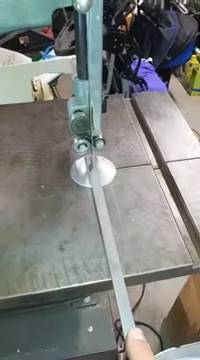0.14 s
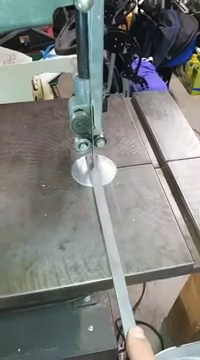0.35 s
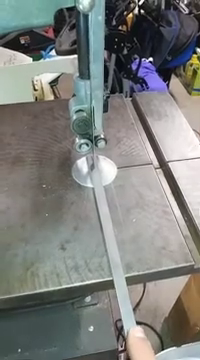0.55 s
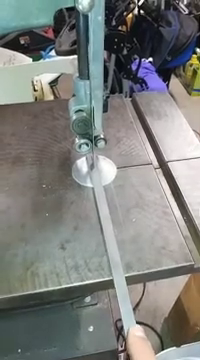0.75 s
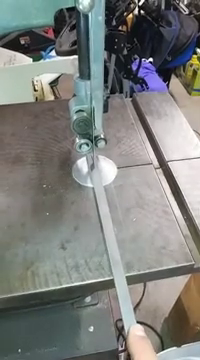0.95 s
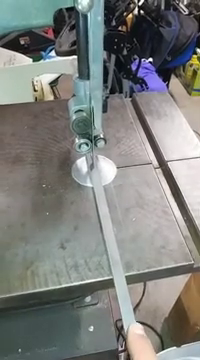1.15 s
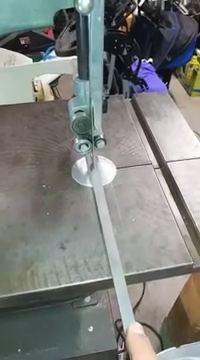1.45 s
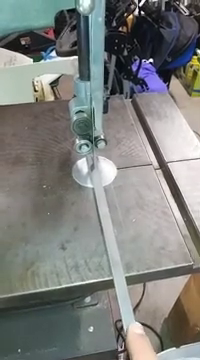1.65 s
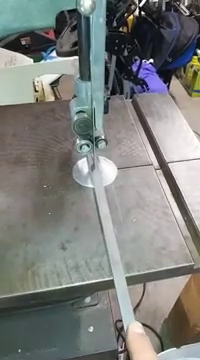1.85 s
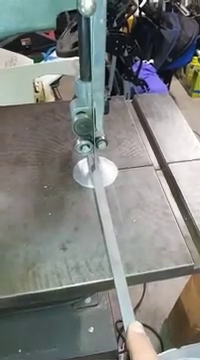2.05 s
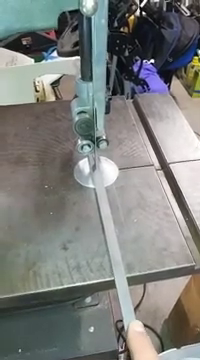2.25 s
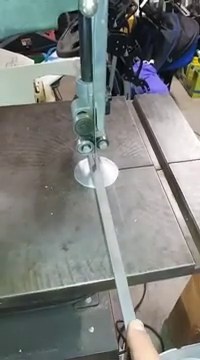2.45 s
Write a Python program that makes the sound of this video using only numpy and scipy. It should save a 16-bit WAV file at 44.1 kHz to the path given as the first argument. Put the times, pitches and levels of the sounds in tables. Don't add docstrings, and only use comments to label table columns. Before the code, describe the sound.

A bandsaw cuts a steel bar without pause, close to a phone microphone in a workshop; harsh grinding roar, two wavering metallic rings, gritty hiss and a faint motor hum, loud and compressed throughout.

```python
import sys
import numpy as np
from scipy import signal
from scipy.fft import rfft, irfft
from scipy.io import wavfile
from scipy.ndimage import uniform_filter1d, minimum_filter1d

SR = 44100
rng = np.random.default_rng(int(sys.argv[2]) if len(sys.argv) > 2 else 0)


def amplitude_ratio(level_db):
    exponent = np.asarray(level_db, float) / 20
    return 10 ** exponent


def output_pcm(signal):
    pcm = np.clip(np.atleast_2d(signal).T, -1, 1) * 32767
    wavfile.write(sys.argv[1], SR, np.round(pcm).astype(np.int16))


N = 114660

# start_s, level_db
FEED_COURSE = [
    (0, 0),
    (.3, 4),
    (.65, -2),
    (.87, -1.5),
    (1.02, -3.5),
    (1.2, -1),
    (1.4, -0.5),
    (1.7, 2),
    (2.3, 0.5),
    (2.6, 4),
]


def evened(x):
    return x / np.sqrt(np.mean(x ** 2, axis=-1, keepdims=True) + 1e-20)


def read(points, hz):
    f, *cols = np.transpose(points)
    return np.array([np.interp(np.log(hz + 1), np.log(f + 1), c) for c in cols])


def control(rows, index=1):
    return np.interp(np.arange(N) / SR, np.transpose(rows)[0], np.transpose(rows)[index])


def drift(top_hz):
    hop = 64
    steps = N // hop + 2
    lowpass = 1 / (1 + (np.fft.rfftfreq(steps, hop / SR) / top_hz) ** 4)
    slow = irfft(rfft(rng.standard_normal(steps)) * lowpass, steps)
    return np.interp(np.arange(N) / hop, np.arange(steps), evened(slow))


def surges(rows):
    t = np.arange(N) / SR
    return sum(db * np.exp(-(2 * (t - s) / length_s) ** 2) for s, db, length_s in rows)


def above(x, edge_hz):
    return irfft(rfft(x) * (np.fft.rfftfreq(N, 1 / SR) > edge_hz), N)


def ports(pair, hz):
    # freq_hz, likeness [0-1], left_lead_rad
    port_likeness = [(60, .28, 1), (110, 0.49, 0.4), (171, 0.14, 1.5), (284, 0.73, -1.5), (500, 0.43, 1.75),
                     (760, 0.72, -0.5), (990, 0.68, -1.33), (1570, 0.65, 0.7), (2026, 0.92, -0.48),
                     (2310, 0.32, 2.5), (3240, 0.25, 2), (4240, 0.18, 3.5), (5830, 0.39, 7),
                     (7250, 0.33, 5)]
    same, lead_rad = read(port_likeness, hz)
    same = np.clip(same, -1, 1)
    right = same * np.exp(-1j * lead_rad) * pair[0] + np.sqrt(1 - same ** 2) * pair[1]
    return np.array([pair[0], right])


def bites():
    bites_per_s, spread_db = 5000, 4.5
    size = amplitude_ratio(spread_db * np.minimum(rng.exponential(1, (N, 2)), 5)) * rng.standard_normal((N, 2))
    return evened((size * (rng.random((N, 2)) < bites_per_s / SR)).T)


def modes(table, strand_db):
    strand_hz = 3.7
    hz, drive = np.fft.rfftfreq(N, 1 / SR), rfft(bites())
    apart = np.exp(-2j * np.pi * hz * 0.137)
    total = 0
    for k, (mode_hz, width_hz, left_db, right_db) in enumerate(table):
        level_db = np.array([[left_db], [right_db]]) + strand_db * drift(strand_hz)
        resonance = 1 / (1 + 1j * (hz - mode_hz) / width_hz) ** 2
        ringing = irfft(ports(drive, mode_hz) * apart ** k * resonance, N)
        total = total + amplitude_ratio(level_db) * evened(ringing)
    return total


def noise(spectrum, patch_db):
    frames, hz = N // 256 + 5, np.fft.rfftfreq(1024, 1 / SR)
    a, b, c, d, patches = rng.standard_normal((frames, 513, 5)).T
    patches = uniform_filter1d(patches, size=10, axis=0)
    patches = evened(uniform_filter1d(patches, size=10, axis=1))
    level_db = read(spectrum, hz)[:, :, None] + patch_db * patches
    z = ports([a + 1j * b, c + 1j * d], hz[:, None]) * amplitude_ratio(level_db)
    return 9.1 * signal.istft(z, nperseg=1024, noverlap=768)[1][:, :N]


def bite_level():
    # start_s (centre), level_db, length_s
    grabs = [(0.027, 11, 0.034), (.129, 5, 0.064), (0.28, 2, 0.02), (0.363, 3.5, 0.061), (0.484, 7, 0.062),
             (0.569, 10, 0.028), (0.696, 7, 0.062), (0.808, 5.5, 0.033), (0.956, 2.5, 0.042),
             (1.105, 4.5, .038), (1.247, 3.5, 0.036), (1.309, 9, 0.035), (1.353, 7.5, 0.018),
             (1.413, 3, 0.018), (1.45, 7.5, 0.0098), (1.73, 7, 0.039), (1.905, 1.5, 0.034),
             (2.11, 3, 0.022), (2.26, 3, 0.039), (2.361, 8.5, 0.031), (2.448, 6.5, 0.028),
             (.09, -0.5, 0.022), (.21, 5, 0.014), (.435, -4.5, .04), (.525, 2, 0.017), (.62, 2.5, 0.022),
             (.765, -0.5, .03), (.845, 3, 0.029), (.91, 1.5, .02), (1.17, 1, .03), (1.51, 2.5, .03),
             (1.57, 0.5, 0.023), (1.625, 1.5, .03), (1.685, -3.5, .04), (1.965, 0.5, 0.034),
             (2.145, 0.5, .03), (2.405, -2.5, .03), (2.51, -1.5, 0.024)]
    flicker_db, flicker_hz = 0.9, 24.4
    return control(FEED_COURSE) + surges(grabs) - 1.0 + flicker_db * drift(flicker_hz)


def motor():
    # freq_hz, level_db
    hum_lines = [
        (120, -47),
        (240, -42.5),
    ]
    t = np.arange(N) / SR
    total = 0
    for hz, db in hum_lines:
        level = amplitude_ratio(db + 2.5 * drift(3.1)) * np.sqrt(2)
        total = total + level * np.sin(2 * np.pi * (hz * t + rng.random()) + 1.1 * drift(7.2))
    return total


def frame(bite_db):
    # freq_hz, width_hz, left_db, right_db
    frame_modes = [(313, 12.6, -36, -36.5), (355.2, 8, -41.5, -35.5), (449.2, 28, -30, -35),
                   (642.5, 25, -25.5, -61), (740.7, 21.3, -26.5, -32), (834, 50, -24.5, -35),
                   (914.5, 23, -23.5, -23.5), (975, 28, -24, -24.5), (1337, 30, -35.5, -34),
                   (1536, 26, -28, -31.5), (1678, 24.6, -32, -27), (2010, 22, -33.5, -29.5),
                   (2104, 32, -38, -29.5), (2147, 9.2, -42.5, -26.5)]
    # freq_hz, left_db_per_hz, right_db_per_hz
    roar = [(25, -81, -82), (100, -70, -67.5), (200, -64.5, -65.5), (443, -61, -59.5), (804, -53.5, -57.5),
            (1210, -52.5, -57.5), (2630, -60, -58), (7360, -115, -115)]
    # start_s (centre), level_db, length_s
    upper_flares = [(.1, 1, 0.059), (.33, 0, 0.034), (.625, -6, 0.026), (.905, 5, 0.029), (.995, -2, .04),
                    (1.39, -1.5, 0.045), (1.55, 1, 0.042), (1.95, 1.5, 0.13), (2.04, -1, 0.061),
                    (2.3, 2, 0.13), (2.55, 0.5, 0.079)]
    follows, upper_hz, upper_follows = 0.23, 1780, 0.14
    body = (modes(frame_modes, strand_db=2) + noise(roar, patch_db=0.5)) * amplitude_ratio(follows * bite_db)
    upper_gain = amplitude_ratio(upper_follows * bite_db + surges(upper_flares))
    return body + above(body, upper_hz) * (upper_gain - 1)


def blade_rasp(bite_db):
    # freq_hz, width_hz, left_db, right_db
    rasp_mode = [(5370, 120, -33, -33)]
    fade_db_per_s = -12
    return modes(rasp_mode, strand_db=2.5) * amplitude_ratio(bite_db + fade_db_per_s * np.arange(N) / SR)


def blade_and_chips(bite_db):
    # freq_hz, width_hz, left_db, right_db
    squeal_modes = [(1599, 33, -33, -34.5), (2341, 30, -47, -35.5), (2690, 990, -58, -30.5),
                    (3030, 19, -41, -48), (3082, 31, -48.5, -33.5), (3823, 57, -39, -39),
                    (4230, 60, -44, -39), (4620, 70, -61, -37), (5345, 270, -34, -34.5),
                    (6340, 230, -40.5, -45), (6670, 240, -53, -41), (7320, 270, -76, -24.5),
                    (7506, 72, -86, -26.5), (7820, 200, -77, -26)]
    # freq_hz, left_db_per_hz, right_db_per_hz
    hiss = [(1500, -71.5, -71), (3280, -63.5, -67), (6200, -72, -59.5), (7300, -101, -60),
            (8800, -110, -69.5), (10600, -91, -70.5), (11330, -84.5, -69.5), (15500, -84, -79.5)]
    air_hz, air_follows = 12000, 0.5
    chips = (modes(squeal_modes, strand_db=1.5) + noise(hiss, patch_db=0.5)) * amplitude_ratio(bite_db)
    return chips + above(chips, air_hz) * (amplitude_ratio(air_follows * control(FEED_COURSE)) - 1)


def ring(table, swell, lapses, core_db, lag_rad, wander_rad):
    steady, hold = 0.6, 0.9
    base_core_db, cluster_db, core_waver_db, port_slip_rad = -4.5, -5, 2.5, 0.59
    cluster = modes(table, strand_db=1.25)
    flutter = np.sqrt(abs(uniform_filter1d(cluster ** 2, size=400, axis=1))) + 0.025
    cluster = evened(cluster / flutter ** steady)

    port_lag = -lag_rad + port_slip_rad * drift(7.8)
    slips = wander_rad * drift(14.4) + np.array([[0], [1]]) * port_lag
    turns = np.cumsum(control(swell, index=2)) / SR
    core = np.sqrt(2) * np.sin(2 * np.pi * turns + slips)
    core = core * amplitude_ratio(core_waver_db * np.array([drift(5.7), drift(14.0)]))

    both = amplitude_ratio(base_core_db + core_db) * core + amplitude_ratio(cluster_db) * cluster
    beating = np.sqrt(abs(uniform_filter1d(np.mean(both ** 2, axis=0), size=500))) + 0.25
    return both / beating ** hold * amplitude_ratio(control(swell) + surges(lapses) + 3.5)


def high_ring():
    # freq_hz, width_hz, left_db, right_db
    cluster = [(1110.5, 7.3, 19.5, 5), (1120.8, 14.8, 14, 2.5), (1118, 27, 2, 10), (1125, 6, 10, -52.5)]
    # start_s, level_db, pitch_hz (clean core)
    swell = [(0, -22, 1125), (0.169, -15, 1118), (.33, -14, 1107), (.4, -15.5, 1105), (.53, -10.5, 1121),
             (.62, -16.5, 1113), (.73, -9.5, 1118), (.82, -17.5, 1121), (1.099, -19, 1116),
             (1.3, -17, 1124), (1.499, -20, 1109), (1.6, -16, 1112), (1.751, -21, 1120), (1.95, -20, 1108),
             (2.03, -15.5, 1126), (2.32, -17, 1104), (2.45, -23.5, 1122), (2.6, -15, 1112)]
    # start_s (centre), level_db, length_s
    slips = [(0.063, -11, .025), (0.112, -10, .03), (0.219, -18, 0.018), (0.261, -21, 0.019),
             (0.308, -13, .02), (0.444, -2, .03), (0.58, -7.5, 0.037), (.688, -8, 0.022), (.87, -5, 0.027),
             (.93, 1.5, 0.034), (1.015, -3, .03), (1.113, 3, 0.023), (1.184, -6, .03), (1.313, -8, 0.016),
             (1.375, -9, 0.022), (1.474, -1, 0.018), (1.545, -8, 0.034), (1.624, -2, .025), (1.693, 0, .03),
             (1.753, -5, 0.029), (1.783, 6.5, 0.037), (1.905, -8, 0.037), (2.065, 2, 0.022),
             (2.187, -2, .025), (2.253, -3, 0.023), (2.359, -1, .03), (2.452, -13, 0.022)]
    return ring(cluster, swell, slips, core_db=-3.5, lag_rad=0.24, wander_rad=1.55)


def low_ring():
    # freq_hz, width_hz, left_db, right_db
    cluster = [(524, 4.1, 3, -39), (550.7, 12.4, 2, 11), (571.5, 8.2, 9.5, 10.5), (584.6, 6.3, 2, -40)]
    # start_s, level_db, pitch_hz (clean core)
    swell = [(0, -18.5, 576.5), (0.101, -9.5, 567.8), (0.219, -10, 560), (.33, -14.5, 548), (.42, -13, 560),
             (.55, -15.5, 550), (.6, -14, 563.4), (.9, -17, 551.8), (1.03, -9, 567), (1.2, -10, 571.8),
             (1.32, -13.5, 567.4), (1.5, -13, 560.7), (1.84, -13.5, 565.5), (1.979, -13, 556),
             (2.06, -23.5, 545), (2.22, -13, 561.3), (2.4, -14.5, 568.5), (2.6, -18.5, 558)]
    # start_s (centre), level_db, length_s
    slips = [(0.036, 10, 0.019), (0.071, -9, 0.018), (0.103, -17, 0.014), (0.144, -14.5, 0.03),
             (.185, -8.5, 0.026), (0.274, -20, 0.026), (0.324, -9.5, 0.026), (0.382, -7.5, 0.032),
             (.67, 0, .03), (0.752, -10, 0.033), (0.835, -9, .02), (0.941, -8, 0.036), (1.121, -10, 0.098),
             (1.257, -6, 0.019), (1.392, -5.5, 0.019), (1.603, -8, 0.013), (1.708, -14, .02),
             (1.904, -4.5, .03), (1.941, -5, 0.018), (2.267, -13, 0.022), (2.31, -24, .03),
             (2.432, -3.5, .03)]
    return ring(cluster, swell, slips, core_db=1.0, lag_rad=0.76, wander_rad=0.94)


def scene():
    bite_db = bite_level()
    background = motor() + frame(bite_db)
    cutting = blade_rasp(bite_db) + blade_and_chips(bite_db)
    return background + cutting + high_ring() + low_ring()


def gate(x):
    # freq_hz, band_level_db
    floor = [(6000, -75), (8000, -57), (9400, -55), (9700, -57), (12300, -55), (13000, -45), (15000, -44),
             (15600, -41)]
    hz, _, z = signal.stft(x, SR, nperseg=2048)
    low_hz = hz[:1024, None]
    power = np.mean(abs(z[:, :1024]).reshape(2, 64, 16, -1) ** 2, axis=2)
    band = np.repeat(power, 16, axis=1)
    over_db = 10 * np.log10(band + 1e-20) + 18 - read(floor, hz[:1024])[0][:, None]
    keep = np.clip(over_db / 1.5 + (low_hz < 6000) * 99, 0, 1)
    gated = np.concatenate([z[:, :1024] * keep, z[:, 1024:]], axis=1)
    return signal.istft(gated, SR, nperseg=2048)[1][:, :N]


def roll_off(x):
    return signal.sosfilt(signal.butter(12, 15680, fs=SR, output="sos"), x)


def record(dry):
    knee_db, ratio_share, listen_s = -15.5, 0.4, 0.0088
    ceiling, limit_s = 0.99, 0.0013
    power = uniform_filter1d(0.1 * dry[0] ** 2 + 0.28 * dry[1] ** 2, round(listen_s * SR))
    over_db = np.maximum(10 * np.log10(abs(power) + 1e-12) - knee_db, 0)
    ducked = dry * amplitude_ratio(2.5 - ratio_share * over_db)

    span = round(limit_s * SR)
    gain = np.minimum(ceiling / (abs(ducked) + 1e-9), 1)
    gain = minimum_filter1d(gain, 3 * span, axis=1)
    for _ in range(3):
        gain = uniform_filter1d(gain, span, axis=1)
    mix = gate(ducked * gain)
    return roll_off(mix)


dry = scene()
out = record(dry)
output_pcm(out)
```